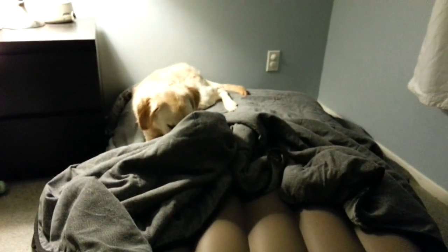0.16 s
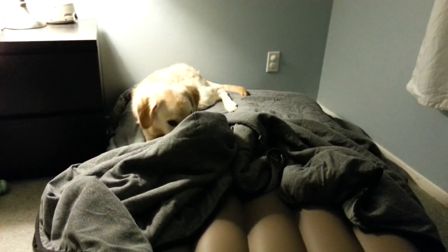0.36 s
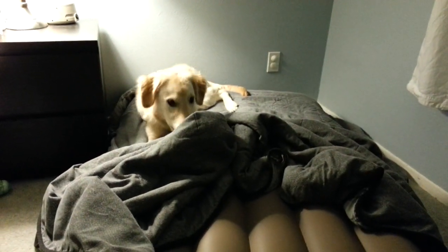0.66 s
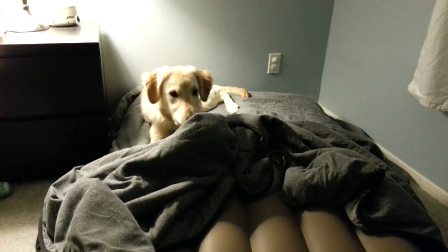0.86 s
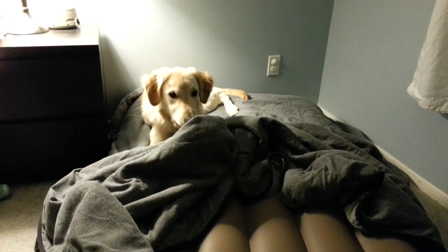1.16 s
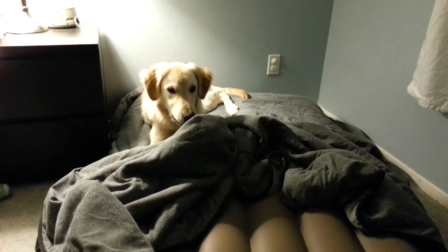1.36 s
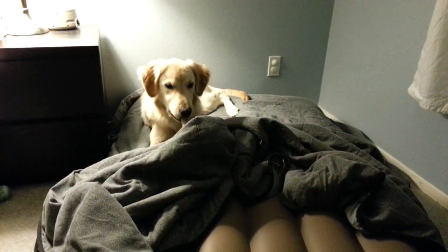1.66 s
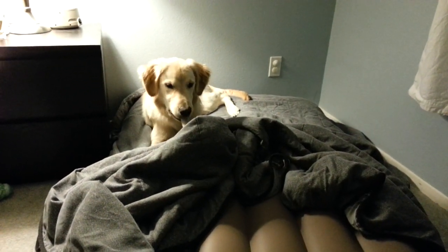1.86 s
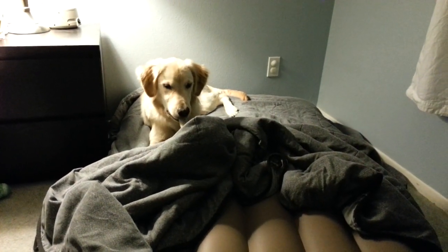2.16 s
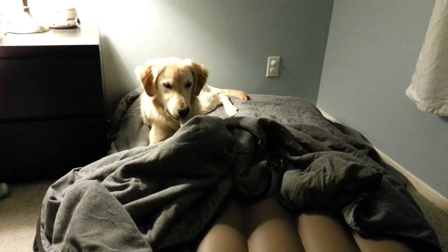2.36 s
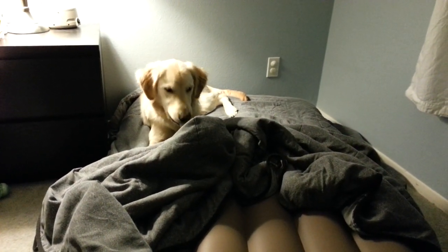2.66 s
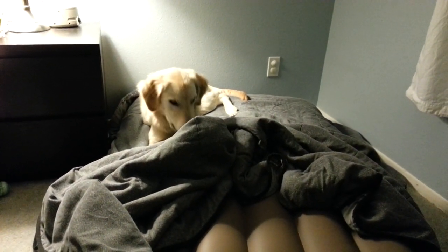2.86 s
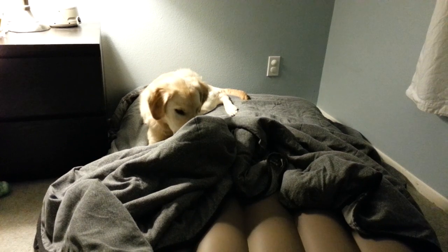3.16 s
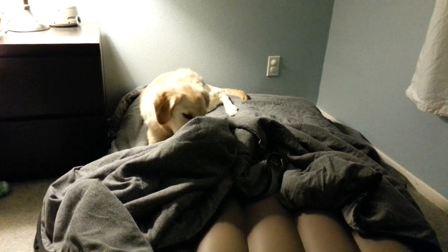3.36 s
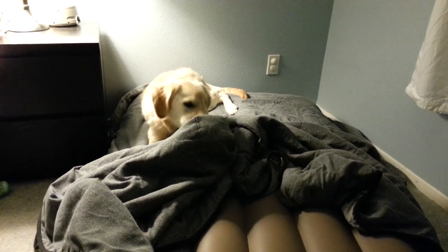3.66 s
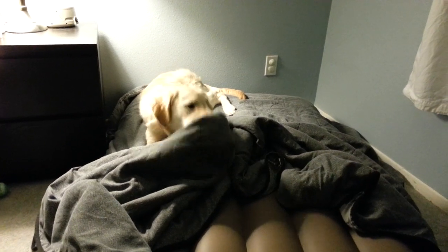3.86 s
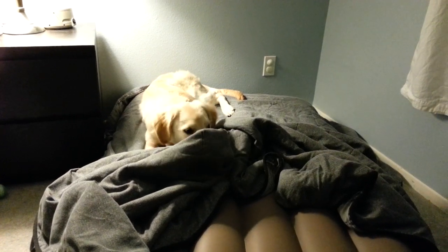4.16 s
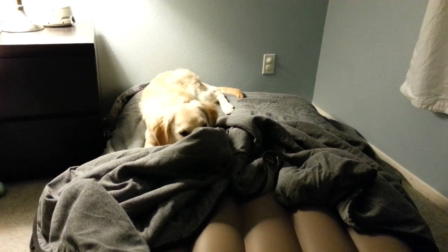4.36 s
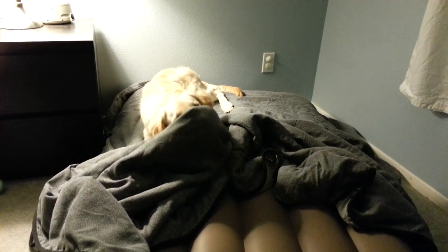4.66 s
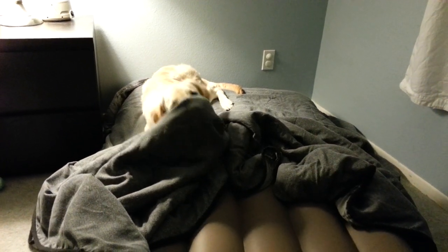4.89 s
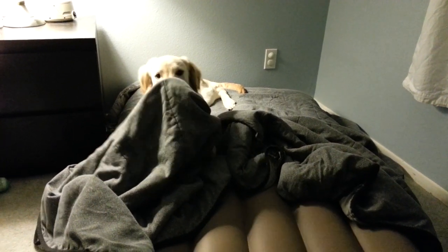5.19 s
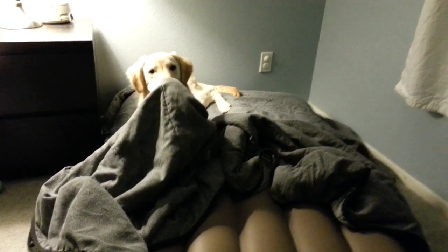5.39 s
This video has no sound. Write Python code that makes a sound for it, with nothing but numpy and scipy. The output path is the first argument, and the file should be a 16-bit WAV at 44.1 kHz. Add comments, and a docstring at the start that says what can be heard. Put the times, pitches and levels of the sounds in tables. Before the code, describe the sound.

Air hisses softly from an inflatable mattress while a dog bumps it with soft knocks, then yanks a blanket with a sudden loud rush.

```python
"""Dog on a deflating air mattress

In a quiet bedroom, near a phone, a turbulent jet hisses steadily from the open valve of a mattress.
A dog lying on it noses at the bedding, and each impact excites the taut skin into a soft knock.
At the end it yanks the blanket up: friction makes a loud rush that eases as the cloth slackens,
coloured by a narrow ringing band and a brief stick-slip squeak."""
import sys
import numpy as np
from scipy import signal
from scipy.fft import rfft, irfft, next_fast_len
from scipy.io import wavfile
from scipy.ndimage import uniform_filter1d, map_coordinates

SR = 44100
rng = np.random.default_rng(int(sys.argv[2]) if len(sys.argv) > 2 else 0)


def log_audio(samples):
    """Write samples as a 16-bit WAV file to the path given in sys.argv[1]."""
    # one column per channel
    frames = np.atleast_2d(samples).T
    # limit to full scale, then quantise
    limited = np.clip(frames, -1, 1)
    pcm = np.round(limited * 32767).astype(np.int16)
    wavfile.write(sys.argv[1], SR, pcm)


N = 243873
TIME_S = np.arange(N) / SR


def amp(db):
    """Decibels as an amplitude ratio."""
    return 10 ** (np.asarray(db) / 20)


def unit(x):
    """Normalisation to an rms of 1."""
    return x / np.sqrt(np.mean(x ** 2) + 1e-20)


def along(points, hz):
    """Interpolation of (frequency_hz, value) points on a log frequency axis."""
    knots_hz, values = np.transpose(points)
    return np.interp(np.log(hz + 1), np.log(knots_hz + 1), values)


def curves(rows):
    """Linear envelopes, one for each column after the time."""
    times_s, *columns = np.transpose(rows)
    return [np.interp(TIME_S, times_s, column) for column in columns]


def wobble(rate):
    """Smooth random modulation with rate knots a second."""
    return map_coordinates(rng.standard_normal(int(N * rate / SR) + 4), [TIME_S * rate])


def filtered(x, response):
    """Linear filtering: the spectrum of x times a complex frequency response."""
    size = next_fast_len(x.shape[-1] + 8192)
    return irfft(rfft(x, size) * response(np.fft.rfftfreq(size, 1 / SR)), size)[..., :x.shape[-1]]


def resonances(modes):
    """Modal superposition of (pitch_hz, width_hz, gain_db) resonators, alternating in sign."""
    return lambda hz: sum((-1) ** k * amp(db) * 1j * hz * width / (pitch**2 - hz**2 + 1j * hz * width)
                          for k, (pitch, width, db) in enumerate(modes))


def patchy(depth_db):
    """Comodulation: three white noises share patches of random gain in time and frequency."""
    spectra = signal.stft(rng.standard_normal((3, N)), nperseg=512)[2]
    patches = uniform_filter1d(uniform_filter1d(rng.standard_normal(spectra.shape[1:]), 6, 0), 10, 1)
    return signal.istft(spectra * amp(depth_db * unit(patches)), nperseg=512)[1][:, :N]


def at_microphones(noises, coherence, balance, lead):
    """Partial coherence: two microphones share one noise, shifted in phase, and each adds its own."""
    side = np.array([[.5], [-.5]])
    share = lambda hz: np.clip(along(coherence, hz), 0, 1)
    gain = lambda hz: amp(side * along(balance, hz))
    shift = lambda hz: np.exp(1j * side * along(lead, hz))
    common = filtered(noises[:1], lambda hz: np.sqrt(share(hz)) * gain(hz) * shift(hz))
    return common + filtered(noises[1:], lambda hz: np.sqrt(1 - share(hz)) * gain(hz))


def coloured(pair, response):
    """Spectral shaping of a stereo pair, with its mid signal brought to an rms of 1."""
    pair = filtered(pair, response)
    return pair / np.std(pair.mean(0))


# Stereo field of the murmur and of the valve's hiss
AIR_COHERENCE = [(60, 0.5), (600, 0.2), (1340, 0.86), (2900, 0.19), (6000, 0.19), (14000, 0.89)]  # frequency_hz, shared_power_fraction
AIR_BALANCE = [(60, 0.5), (110, 0.5), (200, 0.5), (370, 0), (670, 1), (1230, -1), (2250, -5.5),
               (4120, -0.5), (7550, -0.5), (13800, 5.5)]  # frequency_hz, left_over_right_db
AIR_PHASE = [(60, 1), (2600, -0.7), (3400, 2.5), (5200, 0.6), (6400, 6.5), (9000, 10.5), (10500, 4.5),
             (14000, 4.5)]  # frequency_hz, left_lead_rad
# Spectrum of the murmur: frequency_hz, relative_db
MURMUR_SPECTRUM = [(15, -51), (25, -24), (102, -3), (269, 2), (531, -1.5), (729, -3.5), (854, -13),
                   (1100, -4), (1430, -12), (2420, -120)]
# Envelope of the murmur: time_s, level_db
MURMUR_LEVELS = [(0, -57.5), (2.6, -59.5), (3.5, -56.5), (4.75, -58)]


def bedroom():
    """Ambient noise: the low, fluctuating murmur of the house and of shifting bedding."""
    noise = at_microphones(patchy(depth_db=1.5), AIR_COHERENCE, AIR_BALANCE, AIR_PHASE)
    envelope = amp(curves(MURMUR_LEVELS)[0] + 1.35 * wobble(12))
    return envelope * coloured(noise, lambda hz: amp(along(MURMUR_SPECTRUM, hz)))


# Slow course of the escaping air: time_s, jet_db, fizz_db, whistle_gain_db
OUTFLOW = [(0, -46, -44.5, -7), (.5, -47.5, -44, 1), (.9, -49, -45.5, -1), (1.5, -49, -46, -3),
           (1.9, -47, -46.5, -6), (2.15, -49.5, -49, -6), (2.75, -49, -49.5, -3.5),
           (3.6, -49.5, -50.5, 2.5), (4.1, -49.5, -49, -0.5), (4.9, -47.5, -48.5, -2)]
# Spectra of the jet and of the finer fizz above it: frequency_hz, relative_db
JET_SPECTRUM = [(410, -24), (700, -13.5), (747, -9.5), (1010, -9.5), (1510, 0.5), (1780, -1.5),
                (2250, -1.5), (2430, -3), (2630, -2), (3300, -6.5), (4290, -11), (7260, -120)]
FIZZ_SPECTRUM = [(1820, -61), (3100, -15), (3850, -2.5), (4660, 3.5), (5230, 1.5), (5650, 0), (6630, -7.5),
                 (7290, -2.5), (7730, -2.5), (8340, 3), (9000, 1), (9720, -0.5), (11700, 0), (13300, -1.5),
                 (14300, -3.5)]
# Faint whistles of the valve: pitch_hz, width_hz, base_level_db
VALVE_MODES = [(2690, 290, -60), (5230, 550, -62.5)]
# The dog's weight presses more air out: start_s, fizz_gain_db
DOG_PRESSES = [(2.77, 4.5), (3.22, 6), (3.66, 4), (4.15, 3), (4.51, 4), (4.86, 5)]


def valve():
    """Turbulent jet noise swells with each press; narrow resonances of the valve whistle in it."""
    jet_db, fizz_db, whistle_db = curves(OUTFLOW)
    rise_s, fade_s, jet_share = 0.034, 0.34, 0.37
    lull_db, lull_s = -1.5, 0.077  # the hiss dips just before each swell
    press_db = np.zeros(N)
    for start_s, gain_db in DOG_PRESSES:
        age_s = np.maximum(TIME_S - start_s, 0)
        press_db += gain_db * np.minimum(age_s / rise_s, 1) * np.exp(-age_s / fade_s)
        press_db += np.interp(TIME_S - start_s, (-lull_s, 0, rise_s), (0, lull_db, 0))
    air = at_microphones(patchy(depth_db=1.23), AIR_COHERENCE, AIR_BALANCE, AIR_PHASE)
    surge_db = .35 * wobble(6)
    jet = coloured(air, lambda hz: amp(along(JET_SPECTRUM, hz)))
    jet *= amp(jet_db + jet_share * press_db + surge_db + 0.42 * wobble(5.34))
    fizz = coloured(air, lambda hz: amp(along(FIZZ_SPECTRUM, hz)))
    fizz *= amp(fizz_db + press_db + surge_db)
    high_hiss = coloured(air, resonances([(12500, 2800, 0)]))
    high_hiss *= amp(-56) * np.interp(TIME_S, (0.41, 0.44), (1, 0))  # heard only at first
    whistles = 0
    for pitch_hz, width_hz, level_db in VALVE_MODES:
        mode = resonances([(pitch_hz, width_hz, 0)])
        whistles += amp(level_db + 1.4 * wobble(11)) * coloured(air, lambda hz: mode(hz) ** 2)
    return jet + fizz + high_hiss + amp(whistle_db) * whistles


# Reverberation time of the bedroom: frequency_hz, t60_s
ROOM_DECAY = [(200, 0.31), (2000, 0.092), (10000, 0.13)]


def reverberation(x):
    """Diffuse reflections from the walls decay exponentially, each frequency at its own rate."""
    hz, t, spectra = signal.stft(rng.standard_normal((2, SR // 2)), SR, nperseg=256)
    tail = signal.istft(spectra * amp(-60 * t / along(ROOM_DECAY, hz)[:, None]), SR, nperseg=256)[1]
    delayed = np.pad(x, (300, 0))[None]
    return signal.fftconvolve(delayed, tail / np.linalg.norm(tail[0]), axes=1)[:, :N]


# The dog's touches on the mattress: start_s, thud_peak_db, snappiness_db, pitch_hz
TOUCHES = [(0.32, -22.5, -8, 360), (0.328, -23.5, -18, 310), (0.515, -35, -21, 313), (0.532, -34, -17, 439),
           (0.684, -41.5, -5, 650), (1.459, -48.5, -3, 209), (2.058, -50.5, 0, 151),
           (2.138, -42.5, -7, 270), (2.706, -36.5, -13, 332), (3.025, -40.5, -5, 287), (3.268, -40, 6, 453),
           (3.32, -32.5, 4.5, 630), (3.421, -31.5, -1, 611), (3.437, -35, -9, 390), (3.46, -40, -4, 520),
           (3.695, -32, 8, 533), (3.953, -38, 6, 290), (4.082, -24.5, 3, 630), (4.173, -37.5, -4, 600),
           (4.198, -36.5, -8, 606), (4.214, -40, -6, 690), (4.316, -37.5, -8, 257), (4.423, -41.5, 5, 576),
           (4.522, -36.5, -6, 473), (4.618, -36.5, -5, 355), (4.637, -38, 2, 439), (4.69, -34.5, 1, 303),
           (4.781, -28.5, 8.5, 710), (4.938, -29, 1, 616), (4.956, -20, 4, 487)]
# Modes of the taut skin that ring in a snap: pitch_hz, width_hz, relative_db
SKIN_MODES = [(1390, 370, 11), (1830, 250, 15.5), (2616, 146, 17)]


def knocks():
    """Impact excitation: a light landing, a push and a settling drive a thud, a low sag and a snap."""
    track, t = np.zeros(N + SR), np.arange(SR // 4) / SR
    push_s, settle_t60_s, crackle_t60_s = 0.003535, 0.15, 0.045
    landing = amp(4) * np.exp(-((t - .0005) / 0.00012) ** 2)
    push = amp(10.5) * np.exp(-((t - push_s) / 0.000094) ** 2)
    for start_s, peak_db, snappiness_db, pitch_hz in TOUCHES:
        settle = rng.standard_normal(len(t)) * amp(-60 * t / settle_t60_s)
        crackle = 3 * rng.standard_normal(len(t)) * (t > push_s) * amp(-60 * t / crackle_t60_s)
        body = resonances([(175, 150, -10 - 0.33 * snappiness_db),  # snappy knocks sag the mattress less
                           (pitch_hz, 0.44 * pitch_hz, -.4),
                           (2.27 * pitch_hz, 0.53 * pitch_hz, -7)])
        thud = filtered(landing + push + settle, lambda hz: body(hz) * (1j * hz / (80 + 1j * hz)) ** 2)
        snap = filtered(push + crackle, lambda hz: resonances(SKIN_MODES)(hz) / (1 + 1j * hz / 3500)**2)
        knock = thud / np.abs(thud).max() + amp(snappiness_db - 2.5) * snap / np.abs(snap).max()
        track[round(start_s * SR):][:len(t)] += amp(peak_db) * knock
    return track[:N]


def squeak():
    """Stick-slip friction: uneven, slowing slips of the cloth make one resonance of the skin throb."""
    peak_s, hold_s, peak_db, pitch_hz = 5.275, .022, -19, 1747
    rise_db_per_s, fall_db_per_s = 500, 800
    t = TIME_S - peak_s
    level_db = peak_db + rise_db_per_s * np.minimum(t, 0) - fall_db_per_s * np.maximum(t - hold_s, 0)
    slips_per_s = np.clip(160 - 1300 * t, 100, 200) * amp(1.5 * wobble(90))
    throb = (.5 + .5 * np.cos(2 * np.pi * np.cumsum(slips_per_s) / SR)) ** 1.3
    ring = np.sin(2 * np.pi * np.cumsum(pitch_hz + 55 * wobble(250)) / SR)
    return amp(level_db) * unit(throb * ring) * amp([[-1.4], [1.4]])  # slightly to the right


# A narrow ringing band in the blanket's rush: time_s, pitch_hz, level_db
RING_TRACK = [(4.96, 1558, -43), (4.985, 1450, -16), (5.05, 1500, -27), (5.13, 1482, -24),
              (5.165, 1220, -17), (5.2, 1200, -50), (5.3, 1500, -40), (5.38, 1498, -31), (5.53, 1485, -39)]


def rush_ring():
    """Narrow-band noise is heard as a pitch: a ring near 1500 Hz that briefly dips to 1200 Hz."""
    pitch_hz, level_db = curves(RING_TRACK)
    phase = 2 * np.pi * np.cumsum(pitch_hz) / SR
    ring = wobble(260) * np.cos(phase) + wobble(260) * np.sin(phase)
    sounding = TIME_S > RING_TRACK[0][0]
    return sounding * amp(level_db) * unit(ring) * amp([[-1.2], [1.2]])


# Stereo field of the rubbing cloth
CLOTH_COHERENCE = [(60, .6), (280, .9), (1340, .88), (2900, .65), (6000, .45), (14000, .35)]  # frequency_hz, shared_power_fraction
CLOTH_BALANCE = [(60, 1.5), (110, -0.5), (200, 0.5), (370, -0.5), (670, 1), (1230, -1.5), (2250, -6),
                 (4120, 0), (7550, -1), (13800, 13)]  # frequency_hz, left_over_right_db
CLOTH_PHASE = [(60, -0.5), (1640, 0.62), (2500, 1), (4000, 2), (6400, 3), (14000, 8)]  # frequency_hz, left_lead_rad
# Spectra of the cloth when yanked and when sliding: frequency_hz, relative_db
YANK_SPECTRUM = [(47, -73), (80, -43), (208, -21), (434, -14.5), (685, -5.5), (814, -14), (1260, -2.5),
                 (1530, -0.5), (2410, -11.5), (2930, -10.5), (3410, -22.5), (4420, -18.5), (6390, -28),
                 (8290, -31), (14300, -43.5)]
SLIDE_SPECTRUM = [(47, -65), (80, -44), (113, -28), (150, -32.5), (288, -22), (463, -19.5), (670, -12),
                  (888, -15), (1530, -2.5), (2310, -16.5), (2870, -10), (3800, -23), (4520, -13),
                  (5490, -23), (14300, -27.5)]
# Envelope of the blanket's midrange scrape: time_s, level_db
SCRAPE_LEVELS = [(4.93, -60), (4.954, -40), (4.976, -15.5), (5.004, -12), (5.026, -14.5), (5.138, -15),
                 (5.216, -23.5), (5.28, -22.5), (5.422, -28), (5.53, -26.5)]


def blanket():
    """Friction noise: fibres catch and slip in clumps, loud at the jerk, softer as the cloth slackens."""
    jerk_s, grip_db_per_s, slackening_s = 4.99, 697, (5.2, 5.3)
    start = round(SCRAPE_LEVELS[0][0] * SR)
    t = TIME_S[start:] - jerk_s
    slack = np.interp(TIME_S[start:], slackening_s, (0, 1))
    cloth = at_microphones(patchy(depth_db=.9)[:, start:], CLOTH_COHERENCE, CLOTH_BALANCE, CLOTH_PHASE)

    def envelope(yank_db, jerk_db, fade_s, slide_db):
        """A steep attack as the cloth pulls tight, then a decay to the sliding level."""
        transient_db = grip_db_per_s * np.minimum(t, 0) + jerk_db * np.exp(-np.maximum(t, 0) / fade_s)
        return amp(transient_db + (1 - slack) * yank_db + slack * slide_db)

    def band(low_hz, high_hz):
        """Band-limited noise that crossfades from the yank's spectrum to the slide's."""
        passband = lambda hz: 1 / (1 + (hz / high_hz) ** 6) - 1 / (1 + (hz / low_hz) ** 6)
        yank = coloured(cloth, lambda hz: amp(along(YANK_SPECTRUM, hz)) * passband(hz))
        slide = coloured(cloth, lambda hz: amp(along(SLIDE_SPECTRUM, hz)) * passband(hz))
        return (1 - slack) * yank + slack * slide

    clumps = unit(amp(1.6 * wobble(260)[start:]))
    lows = envelope(yank_db=-29, jerk_db=5, fade_s=.5, slide_db=-39) * band(20, 900)
    scrape = amp(curves(SCRAPE_LEVELS)[0][start:]) * clumps * band(900, 3300)
    highs = envelope(yank_db=-33.5, jerk_db=11, fade_s=.1, slide_db=-34.5) * band(3300, 7500)
    sheen = envelope(yank_db=-46, jerk_db=10, fade_s=.06, slide_db=-57) * band(7500, 20000)
    return np.pad(lows + scrape + np.sqrt(clumps) * (highs + sheen), ((0, 0), (start, 0)))


def scene():
    """Superposition of all sources; only the knocks reverberate."""
    impacts = knocks()
    direct = valve() + bedroom() + blanket() + rush_ring() + squeak() + impacts
    return direct + amp(-6) * reverberation(impacts)


def record(dry):
    """Soft saturation and band limiting: the phone flattens the highest peaks and cuts the top treble."""
    ceiling, band_limit_hz = 1.1, 14450
    saturated = dry / (1 + np.abs(dry / ceiling) ** 12) ** (1 / 12)
    return filtered(saturated, lambda hz: hz < band_limit_hz)


dry = scene()
out = record(dry)
log_audio(out)
```